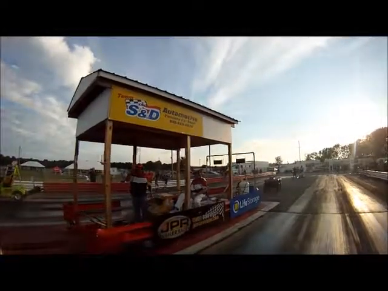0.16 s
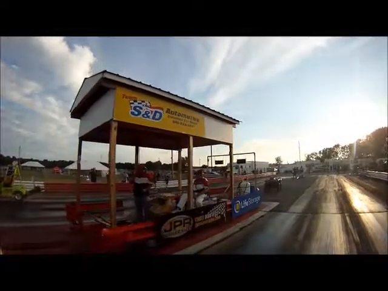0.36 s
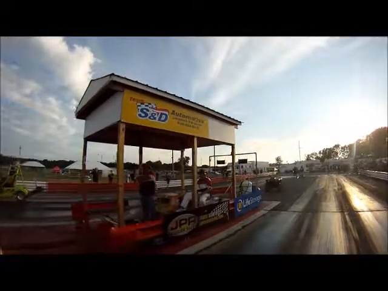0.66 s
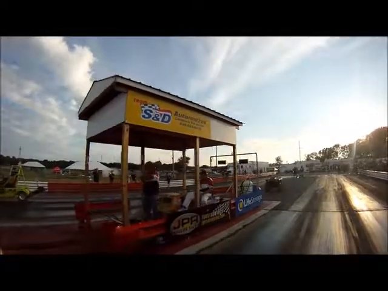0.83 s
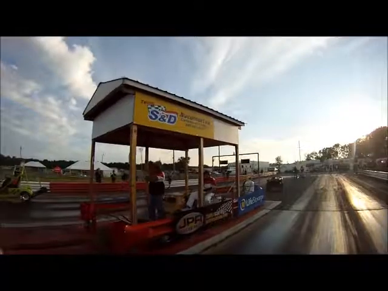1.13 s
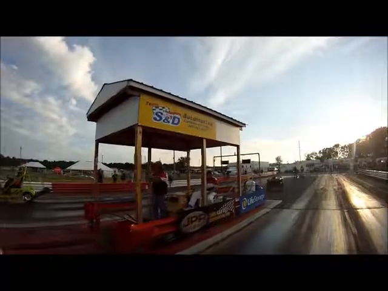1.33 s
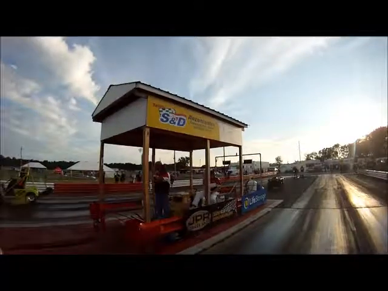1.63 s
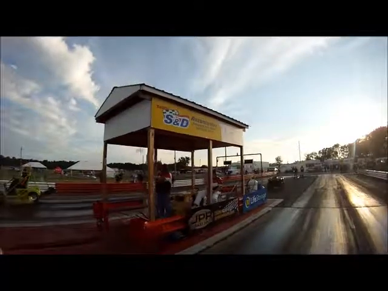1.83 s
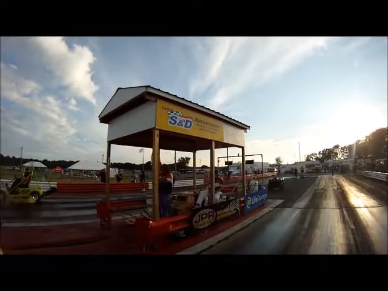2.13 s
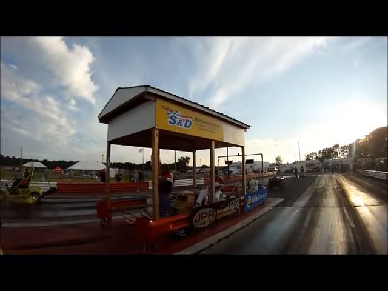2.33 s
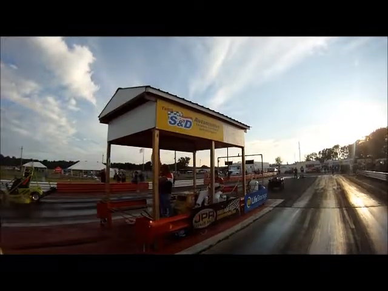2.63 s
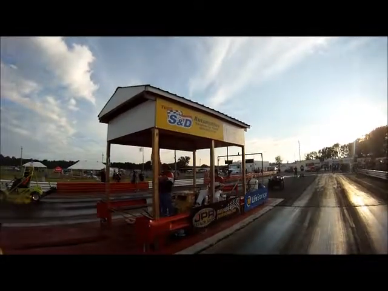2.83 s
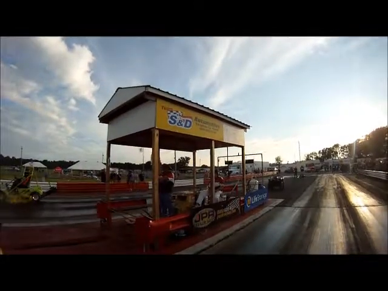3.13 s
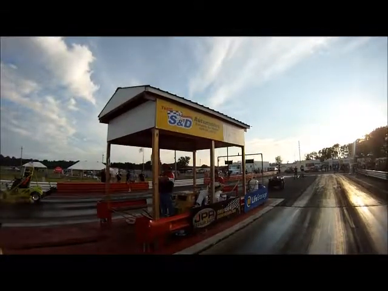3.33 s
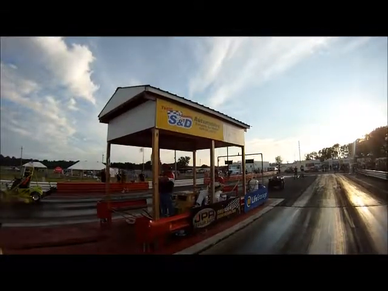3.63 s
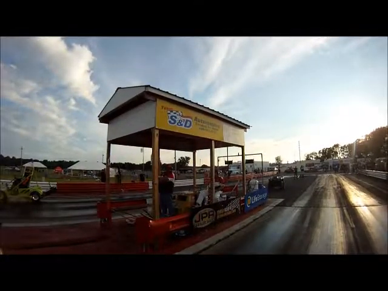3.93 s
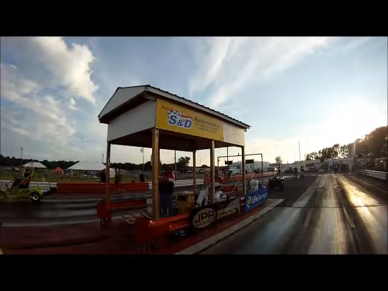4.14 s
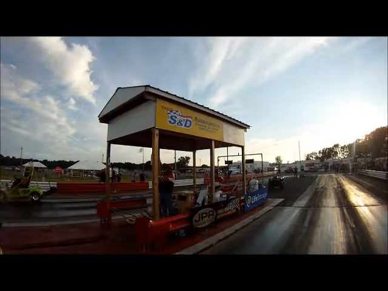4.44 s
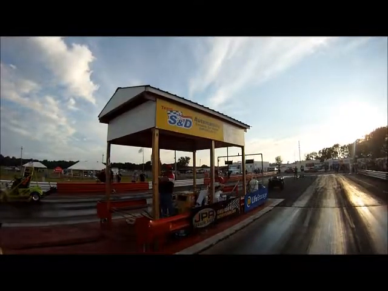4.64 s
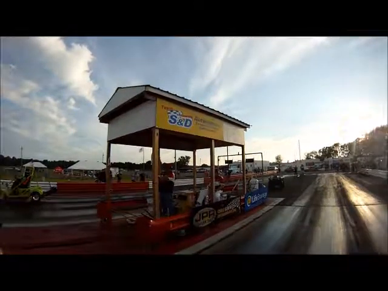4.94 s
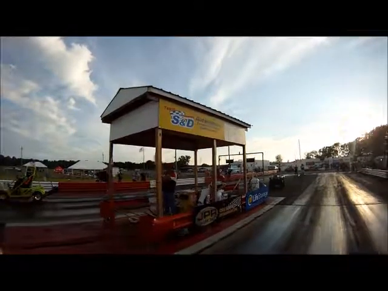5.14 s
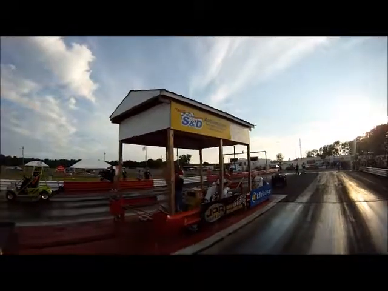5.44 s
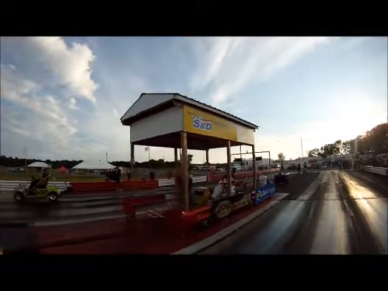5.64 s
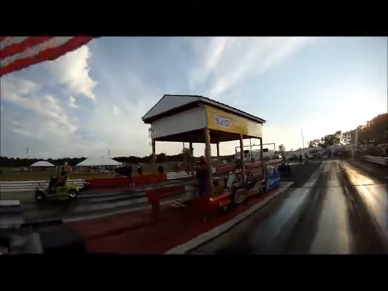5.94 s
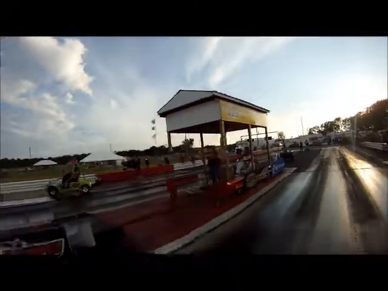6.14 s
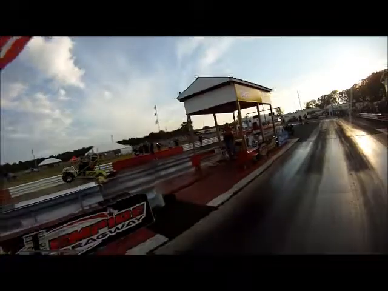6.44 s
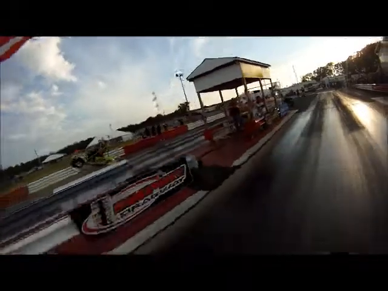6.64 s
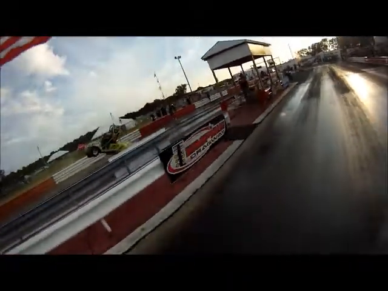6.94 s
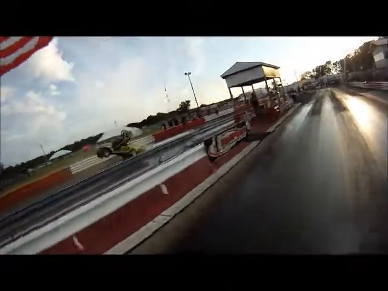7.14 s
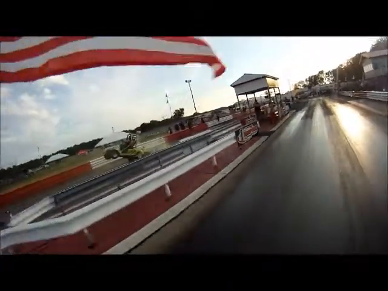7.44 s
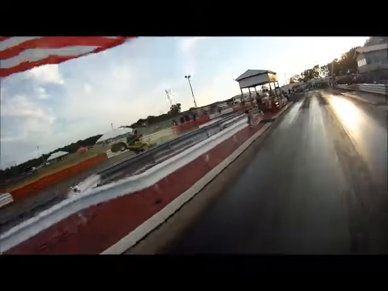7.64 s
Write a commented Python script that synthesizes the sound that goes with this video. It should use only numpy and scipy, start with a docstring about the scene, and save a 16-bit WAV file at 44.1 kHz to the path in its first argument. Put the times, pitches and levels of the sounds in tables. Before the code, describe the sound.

A two-stroke racing cart sputters and pops at the start line, then launches with a knock and climbs in pitch as wind builds.

```python
"""Two-stroke golf cart launch

A tuned racing cart, heard from a camera on board. On the start line the rev limiter cuts most sparks,
so the exhaust sputters and pops through the ringing pipe. With a knock it launches: every turn fires
and the pitch climbs down the strip, with wind and a shaking frame. The loud pulses overload the
microphone, and the camera's slow sampling adds a metallic treble."""
import sys
import numpy as np
from scipy import signal
from scipy.fft import rfft, irfft, next_fast_len
from scipy.io import wavfile
from scipy.ndimage import map_coordinates

SR = 44100
rng = np.random.default_rng(int(sys.argv[2]) if len(sys.argv) > 2 else 0)


def generate_wav(signal):
    """Clip the signal to [-1, 1] and save it as 16-bit WAV at the path in sys.argv[1]."""
    frames = np.transpose(np.atleast_2d(signal))
    scaled = np.clip(frames, -1, 1) * 32767
    pcm = np.round(scaled).astype(np.int16)
    wavfile.write(sys.argv[1], SR, pcm)


N = 343098
TIME = np.arange(N) / SR
LIMITER_HZ, LAUNCH_S = 107, 4.503

# accents, the loudest pops on the start line: t/s, strength/dB above LOUD_DB
LOUD_POPS = [(0.0463, 0), (0.0742, -1), (0.1017, 1), (0.1296, -4), (0.167, 0), (0.1945, 1), (0.2224, -5),
             (0.2783, -2), (0.3346, -2), (0.41, -3), (0.4469, 1), (0.5038, -4), (0.5412, -4), (0.626, -1),
             (0.6639, -1), (0.7297, -1), (0.8145, -2), (0.9847, -1), (1.0226, 0), (1.051, -1), (1.1458, 0),
             (1.1742, 0), (1.26, -1), (1.3922, 0), (1.4207, -2), (1.4491, -3), (1.515, 0), (1.6102, -6),
             (1.6955, -5), (2.1201, -4), (2.2997, -2), (2.5072, -1), (2.5636, -5), (2.6299, -2),
             (2.6963, -2), (2.7531, -8), (2.9706, -4), (3.0081, -1), (3.0365, -1), (3.0644, 0),
             (3.1582, -1), (3.3358, -3), (3.5778, -1), (3.6706, -2), (3.7354, 0), (3.8836, -2),
             (3.9115, -2), (4.1145, 1), (4.143, 1), (4.337, 1), (4.4288, -1), (4.4932, -1)]
# gap to the next spark when the limiter slips off its beat: wait/turns, chance
SLIPS = [(1, .4), (2, .2), (3, .25), (4, .1), (6, .05)]
# feel of the engine on the limiter: t/s, evenness (0 sputter, 1 purr)
EVENNESS = [(0, 0), (1.5, 0), (1.75, 1), (2.2, 0.39), (2.6, 0.15), (3.1, 0.69), (3.35, 0.75), (4.0, 0.47),
            (4.2, 0.89)]
# extra boom and frame throb as the engine settles on the line: t/s, level/dB
BOOM_SWELL = [(0, 0.5), (1.3, 0.5), (1.7, 1.5), (2.9, 1.5), (3.3, 1), (4.5, -0.5)]
# crank speed from the launch on: t/s, f/Hz
REVS = [(4.5, 109.5), (4.89, 121.5), (5.0, 127.1), (5.08, 128.2), (5.28, 138.5), (5.55, 150.8),
        (5.96, 165.9), (6.13, 179.3), (6.23, 174.4), (6.33, 180.1), (6.72, 197.1), (6.9, 195.9),
        (6.98, 206.0), (7.04, 207.3), (7.13, 196.3), (7.19, 204.5), (7.26, 202.4), (7.4, 205.0),
        (7.61, 212.5), (7.78, 213.9)]
# firings upset by bumps: t/s, strength lost/dB (negative hits harder)
MISFIRES = [(6.157, -3), (6.214, 8)]
# ring of pipe and body: f/Hz, half width/Hz, level/dB
PIPE_MODES = [(143, 27, -12.5), (178, 16.6, -2), (289, 27.4, 2), (407, 92, -3), (464.8, 29.2, 6.5),
              (543, 41.4, 1), (701.6, 31.5, -1.5), (778, 19.3, -5), (856.7, 16, -9.5), (1042, 36, -6.5),
              (1148, 41.3, 1.5), (1442, 82, -6.5), (1820, 100, -9), (2056, 92, -1.5), (2377, 111, -1),
              (2528, 50, -2), (2779, 89, 2.5), (3000, 380, -0.5), (3267, 108, -4), (3878, 160, -11),
              (4865, 210, -11.5), (5464, 316, -15)]
# borders of the exhaust's four registers, boom, bark, rasp and crack: f/Hz
REGISTER_EDGES = [60, 900, 1700, 4200, 6000]
# a row a register: pop level/dB, growth/dB per dB of strength, turbulence against the pulse/dB,
# open-throttle level/dB, tilt/dB per octave of revs
REGISTERS = [(-15, 0.5, -17.5, -15, -7.5), (-28.5, 0.71, -19, -27.5, 1), (-21, 1.91, -13.5, -14.5, 2),
             (-37, 3, -13.5, -25.5, 4)]
# level rides on the two low registers during the run: t/s, boom/dB, bark/dB
LOW_RIDES = [(4.5, -1, 3), (5.0, 1, -1.5), (5.6, -1.5, 3), (5.8, -3, -0.5), (6.35, 2, 3.5),
             (6.65, 2.5, -6.5), (7.0, 0, 1.5), (7.78, -2.5, 2)]
# spectrum of wind on the microphone: f/Hz, level/dB
WIND_COLOUR = [(20, -15), (50, -3), (95, -2), (160, -5), (300, -10.5), (700, -10.5), (2000, -33),
               (6000, -45)]
# spectrum of machinery and the distant track: f/Hz, level/dB
DIN_COLOUR = [(40, -28), (120, -17), (350, -28), (700, -3.5), (1500, -3.5), (2700, 2), (4200, -13),
              (6000, -29)]
# jolts to the chassis: t/s, level/dB, time to fall 20 dB/s
KNOCKS = [(4.452, -15, 0.014), (4.464, -26, 0.013), (5.4468, -8, 0.012), (6.145, -23, .03),
          (6.214, -21, 0.027), (6.589, -28, .03), (6.79, -22, .03)]
# spectrum of a knock's body: f/Hz, level/dB
KNOCK_COLOUR = [(30, -16), (150, 2), (300, 2), (600, -16), (1200, -9.5), (3200, -8.5), (5000, -9),
                (6000, -34)]
# lower and upper edge of a knock's bright attack: f/Hz
CLACK_BAND = [700, 3980]
# bouts of frame shudder: middle t/s, half length/s, level/dB
SHAKES = [(5.84, .07, -32), (6.157, 0.073, -29), (7.084, 0.13, -28.5), (7.672, 0.4, -34)]

# firing strengths against a middling pop; each register scales them by its own growth
LOUD_DB, POP_DB, WEAK_DB, PUFF_DB, UNLIT_DB = 5.5, 3, -4, -13, -19.5
PURR_POP_DB, PURR_PUFF_DB = -2.5, 5.5   # a purr has softer pops and fuller puffs
BEAT_TURNS, SLIP_CHANCE = 3, .4


def from_db(db):
    """Decibels to gain."""
    return 10 ** (np.asarray(db) / 20)


def rms_one(x):
    """Scale to unit rms."""
    return x / np.sqrt(np.mean(x ** 2) + 1e-20)


def curve(rows, times, column=0):
    """One value column of a breakpoint curve at the given times."""
    knots, *values = np.transpose(rows)
    return np.interp(times, knots, values[column])


def noise(colour):
    """Noise with the given spectrum, rms 1."""
    hz, db = np.transpose(colour)
    size = next_fast_len(N)
    bins = np.maximum(np.fft.rfftfreq(size, 1 / SR), 1)
    gain = from_db(np.interp(np.log(bins), np.log(hz), db))
    return rms_one(irfft(rfft(rng.standard_normal(size)) * gain, size)[:N])


def drift(rate_hz):
    """Slow random wander, rms 1."""
    knots = rng.standard_normal(4000)
    return rms_one(np.interp(TIME * rate_hz, np.arange(len(knots)), knots))


def bell(middle_s, half_length_s):
    """A smooth swell of height 1."""
    return np.exp(-((TIME - middle_s) / half_length_s) ** 2)


def hit(start_s, db, decay_s):
    """Envelope with an instant attack, falling 20 dB every decay_s."""
    return from_db(db - 20 * np.clip((TIME - start_s) / decay_s, 0, 10)) * (TIME >= start_s)


def clicks(times, heights):
    """Band-limited clicks placed between samples."""
    taps = np.floor(times * SR).astype(int)[:, None] + np.arange(-5, 7)
    offset = taps - times[:, None] * SR
    shape = np.sinc(offset) * np.sinc(offset / 6)
    inside = (taps >= 0) & (taps < N)
    return np.bincount(taps[inside], (shape * heights[:, None])[inside], N)


def accent_turns(rise_s=.0009):
    """Times and turn numbers of the start, each loud pop and the launch, which is turn zero."""
    marks = np.r_[0, np.array(LOUD_POPS)[:, 0] + rise_s, LAUNCH_S]
    turn = np.r_[0, np.cumsum(np.round(np.diff(marks) * LIMITER_HZ))].astype(int)
    return marks, turn - turn[-1]


def crank():
    """Turns of the crankshaft at every sample, zero at the launch."""
    racing = np.cumsum(curve(REVS, TIME)) / SR
    racing -= np.interp(LAUNCH_S, TIME, racing)
    return np.where(TIME < LAUNCH_S, np.interp(TIME, *accent_turns()), racing)


def rev_limiter(puff_spread_db, pop_spread_db):
    """Time and strength of each turn: sparks pop on a slipping three-turn beat, unlit turns puff."""
    marks, numbers = accent_turns()
    times = np.interp(np.arange(numbers[0], 0), numbers, marks)
    loud_turns = numbers[1:-1] - numbers[0]
    waits, chances = np.transpose(SLIPS)
    slip_wait = rng.choice(waits.astype(int), len(times), p=chances)
    slip, puff, pop = rng.random((3, len(times)))
    purr = curve(EVENNESS, times)
    strength = PUFF_DB + puff_spread_db * (2 * puff - 1) + PURR_PUFF_DB * purr
    pop_db = POP_DB + pop_spread_db * (2 * pop - 1) + PURR_POP_DB * purr
    turn, wait = 0, BEAT_TURNS
    for loud in loud_turns:
        while turn < loud:
            left = loud - turn
            on_beat = left % BEAT_TURNS == 0 and (left == BEAT_TURNS or slip[turn] > SLIP_CHANCE)
            third_in_a_row = wait == 1 and slip_wait[turn] == 1
            wait = BEAT_TURNS if on_beat or third_in_a_row else slip_wait[turn]
            if wait >= left - 1:   # unburnt charge collects before a loud pop
                wait = left
            strength[turn + BEAT_TURNS:turn + wait - 1:BEAT_TURNS] = WEAK_DB   # ghost beats in long gaps
            turn += wait
            strength[turn] = pop_db[turn]
    strength[loud_turns - 1] = UNLIT_DB
    strength[loud_turns] = np.array(LOUD_POPS)[:, 1] + LOUD_DB
    return times, strength


def open_throttle(jitter_s, uneven_db, build_s, build_db):
    """Time, rate and strength of each firing on the run: a soft start, then a spark on every turn."""
    turns = crank()
    times = np.interp(np.arange(int(turns[-1]) + 1), turns, TIME)
    timing, force = rng.standard_normal((len(times), 2)).T
    soft_start_db = build_db * np.clip(1 - (times - LAUNCH_S) / build_s, 0, 1)
    bumps_db = sum(db * bell(s, half_length_s=.0029) for s, db in MISFIRES)
    revs_hz = curve(REVS, times)
    spread_db = uneven_db + .5 * np.clip((revs_hz - 190) / 20, 0, 1)   # rougher near top speed
    strength = spread_db * force - soft_start_db - np.interp(times, TIME, bumps_db)
    return times + jitter_s * timing, revs_hz, strength


def pipe_ring(low_hz, high_hz, size=8192):
    """Ring of pipe and body in one register after a click, with unit energy."""
    bins = np.fft.rfftfreq(size, 1 / SR)
    power = sum(from_db(2 * db) / (1 + ((bins - hz) / width) ** 2) ** 2
                for hz, width, db in PIPE_MODES if low_hz <= hz < high_hz)
    # minimum phase: all modes start together at the click and die away after it
    cepstrum = irfft(np.log(power + 1e-9) / 2)
    cepstrum[1:size // 2] *= 2
    cepstrum[size // 2 + 1:] = 0
    ring = irfft(np.exp(rfft(cepstrum)))
    return -ring / np.sqrt(np.sum(ring ** 2))


def exhaust(gust_s, colour_spread_db):
    """Each turn rings the pipe with a pulse and a turbulent gust; hard pulses are steeper, so brighter."""
    held_s, held_strength = rev_limiter(puff_spread_db=11.5, pop_spread_db=2)
    race_s, race_hz, race_strength = open_throttle(jitter_s=4e-6, uneven_db=.4, build_s=.17, build_db=4)
    times = np.r_[held_s, race_s]
    samples_per_turn = SR / np.r_[np.full(len(held_s), LIMITER_HZ), race_hz]
    fade = np.exp(-2 / (gust_s * SR))
    engine = 0
    for k, (pop_db, growth, gust_db, open_db, tilt) in enumerate(REGISTERS):
        held_db = pop_db + growth * held_strength + colour_spread_db * rng.standard_normal(len(held_s))
        race_db = open_db + tilt * np.log2(race_hz / LIMITER_HZ) + growth * race_strength
        if k == 0:
            held_db += curve(BOOM_SWELL, held_s)
        if k < 2:
            race_db += curve(LOW_RIDES, race_s, column=k)
        pulses = clicks(times, from_db(np.r_[held_db, race_db]) * np.sqrt(samples_per_turn))
        gust_power = signal.lfilter([1 - fade], [1, -fade], pulses ** 2 + 1e-18)
        gusts = from_db(gust_db) * np.sqrt(gust_power) * rng.standard_normal(N)
        ring = pipe_ring(REGISTER_EDGES[k], REGISTER_EDGES[k + 1])
        engine += signal.oaconvolve(pulses + gusts, ring)[:N]
    return engine


def strip_echo(engine, level_db, t60_s, dull_hz, predelay_s=.012):
    """Walls and the starter's tower scatter a dull tail, which eases off as the cart leaves them."""
    age = TIME[:SR]
    tail = rng.standard_normal(len(age)) * from_db(-60 * age / t60_s) * (age > predelay_s)
    tail /= np.sqrt(np.sum(tail ** 2))
    tail = signal.sosfilt(signal.butter(1, dull_hz, fs=SR, output="sos"), tail)
    leaving_db = 3.3 * np.clip(TIME - LAUNCH_S, 0, 1)
    return from_db(level_db - leaving_db) * signal.oaconvolve(engine, tail)[:N]


def frame_throb(base_db, db_per_octave):
    """The frame rocks once a turn: a low hum that grows with the revs."""
    octaves = np.log2(curve(REVS, TIME) / LIMITER_HZ)
    level = from_db(base_db + curve(BOOM_SWELL, TIME) + db_per_octave * octaves)
    return np.sqrt(2) * level * np.sin(2 * np.pi * crank())


def wind(rest_db, stream_db, start_s, attack_s, lumpy_db):
    """Air buffets the microphone: a light rumble at rest, then the airstream, with one lull."""
    at_rest = from_db(rest_db - 17 * np.maximum(TIME - LAUNCH_S, 0))   # fades 17 dB/s after the launch
    lull_db = -7 * bell(middle_s=6.66, half_length_s=.14)
    airstream = np.clip((TIME - start_s) / attack_s, 0, 1) * from_db(stream_db + lull_db)
    return (at_rest + airstream) * from_db(lumpy_db * drift(30)) * noise(WIND_COLOUR)


def track_din(level_db):
    """Machinery and the distant track blur into a steady bed."""
    return from_db(level_db) * noise(DIN_COLOUR)


def chassis_knocks():
    """Each jolt of the cart thumps the chassis: a short burst of dark noise."""
    return sum(hit(s, db, decay_s) for s, db, decay_s in KNOCKS) * noise(KNOCK_COLOUR)


def clacks(against_knock_db, decay_s):
    """Metal meets metal: a bright attack on the front of each knock."""
    band = signal.butter(2, CLACK_BAND, "band", fs=SR, output="sos")
    hiss = rms_one(signal.sosfilt(band, signal.sosfilt(band, rng.standard_normal(N))))
    return hiss * sum(hit(s, db + against_knock_db, decay_s) for s, db, _ in KNOCKS)


def wall_bounce(engine, level_db, delay_s, sway_s):
    """One reflection whose path wanders once the cart rolls, gently flanging the engine."""
    rolling = np.clip(TIME - LAUNCH_S, 0, 1)
    delay = delay_s + sway_s * drift(3.2)
    return from_db(level_db) * rolling * map_coordinates(engine, [(TIME - delay) * SR], order=3)


def frame_shake(third_harmonic_db, waver_db):
    """In bouts the frame shudders on every second turn, growling an octave under the engine."""
    phase = np.pi * crank()
    bouts = sum(from_db(db) * bell(s, half) for s, half, db in SHAKES)
    growl = np.sin(phase) + from_db(third_harmonic_db) * np.sin(3 * phase)
    return np.sqrt(2) * bouts * from_db(waver_db * drift(25)) * growl


def scene():
    """Mono mix: the engine up front, with its reflections, the chassis, wind and din around it."""
    engine = exhaust(gust_s=.012, colour_spread_db=1.22)
    bounce = wall_bounce(engine, level_db=-11, delay_s=.0024, sway_s=.00013)
    echo = strip_echo(engine, level_db=-16, t60_s=1, dull_hz=3060)
    din = track_din(level_db=-33)
    throb = frame_throb(base_db=-45, db_per_octave=10.5)
    shake = frame_shake(third_harmonic_db=-5.5, waver_db=2)
    knocks = chassis_knocks()
    air = wind(rest_db=-40.5, stream_db=-31, start_s=5.7, attack_s=.32, lumpy_db=3)
    metal = clacks(against_knock_db=-1, decay_s=.0058)
    return (engine + echo + throb + air + din + knocks + metal + bounce + shake)[None]


def record(dry):
    """The microphone overloads; the camera's slow sample-and-hold mirrors a metallic treble on top."""
    ceiling, mirror_db = .82, -.6
    band_hz, camera_rate_hz, cutoff_hz = 5550, 12000, 15600
    saturated = dry / (1 + (dry / ceiling) ** 6) ** (1 / 6)
    narrow = signal.sosfiltfilt(signal.butter(10, band_hz, fs=SR, output="sos"), saturated)
    mirrored = narrow * (1 + 2 * from_db(mirror_db) * np.cos(2 * np.pi * camera_rate_hz * TIME))
    size = next_fast_len(N)
    bins = np.fft.rfftfreq(size, 1 / SR)
    hold_droop = np.sinc(bins / camera_rate_hz)
    brick_wall = 1 / (1 + (bins / cutoff_hz) ** 120)
    return irfft(rfft(mirrored, size) * hold_droop * brick_wall, size)[:, :N]


dry = scene()
out = record(dry)
generate_wav(out)
```